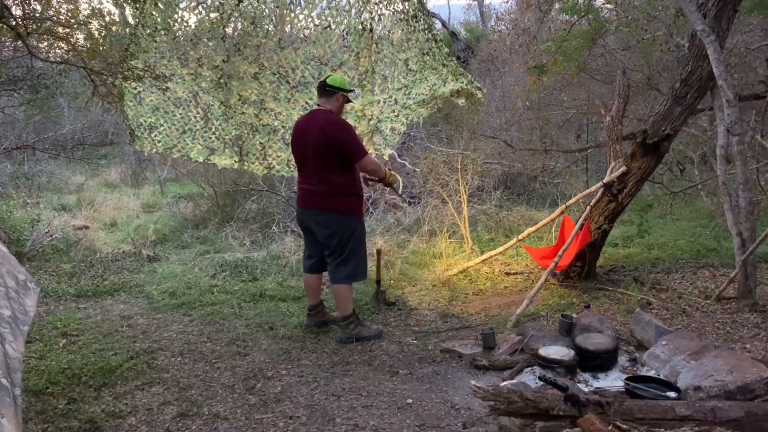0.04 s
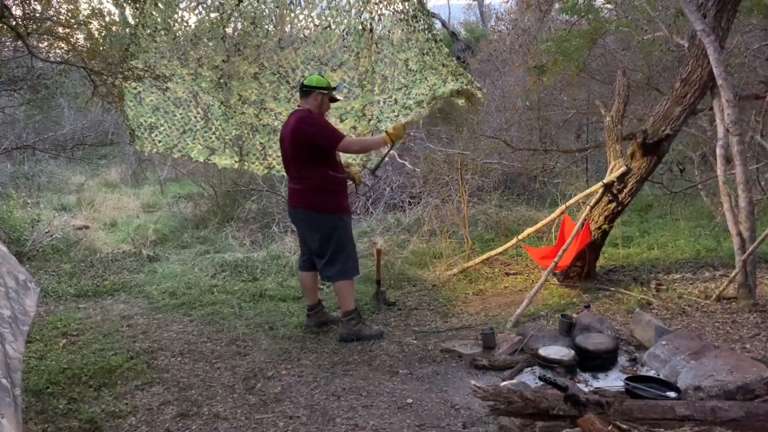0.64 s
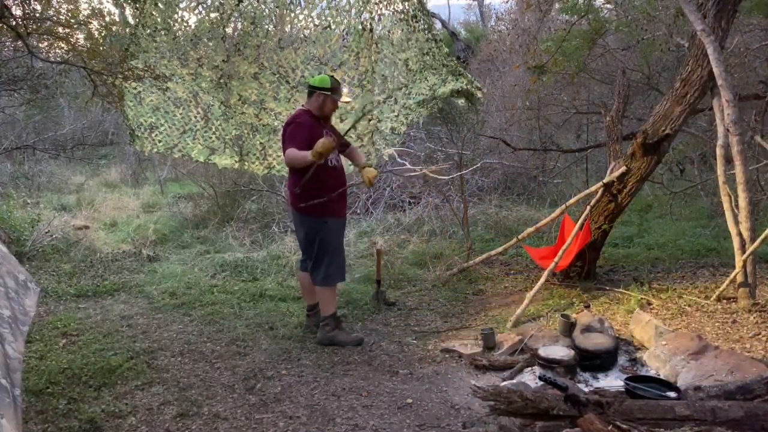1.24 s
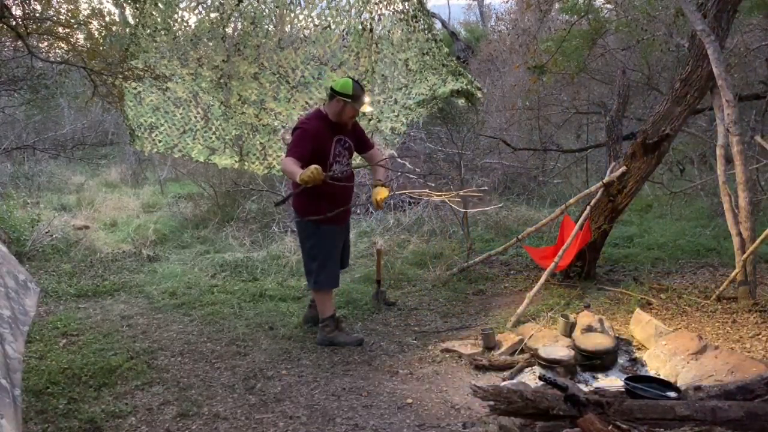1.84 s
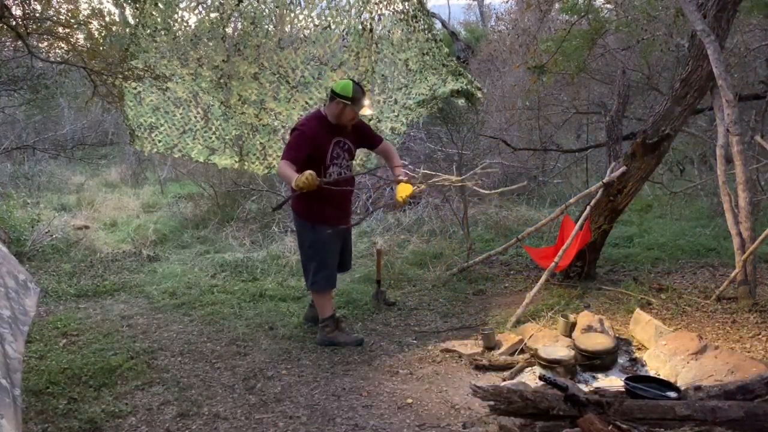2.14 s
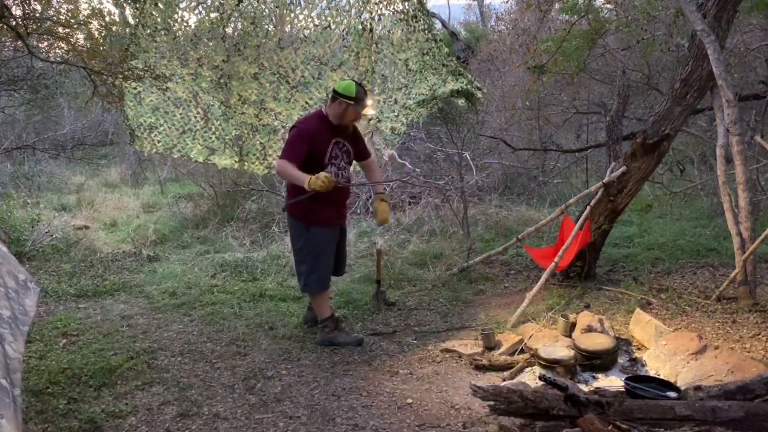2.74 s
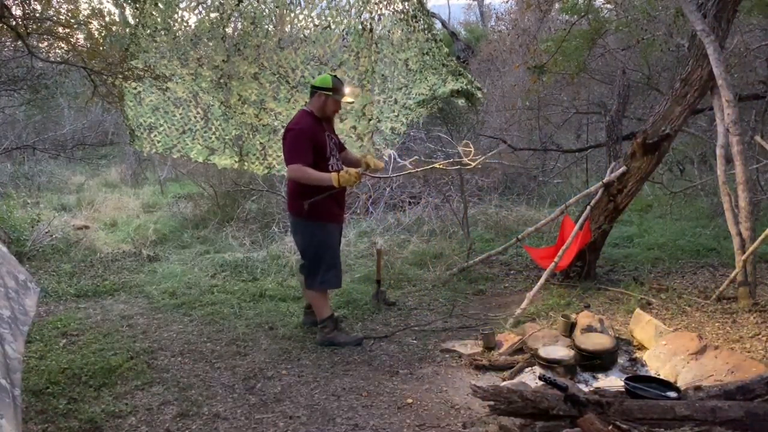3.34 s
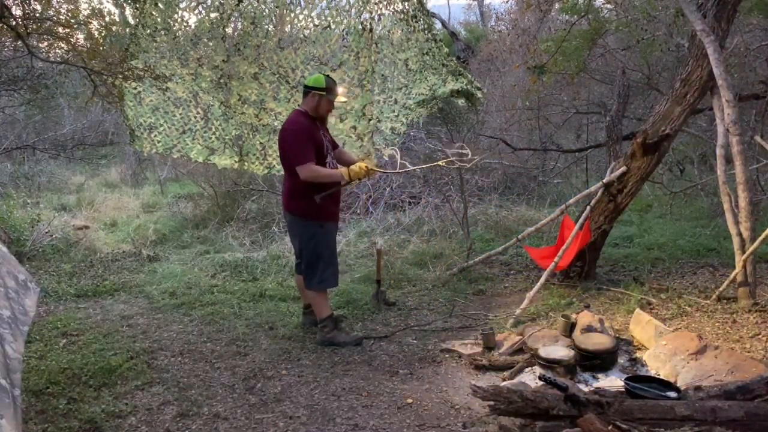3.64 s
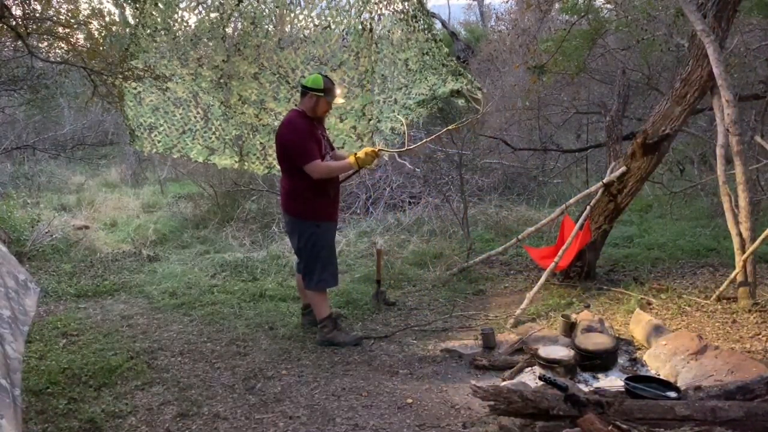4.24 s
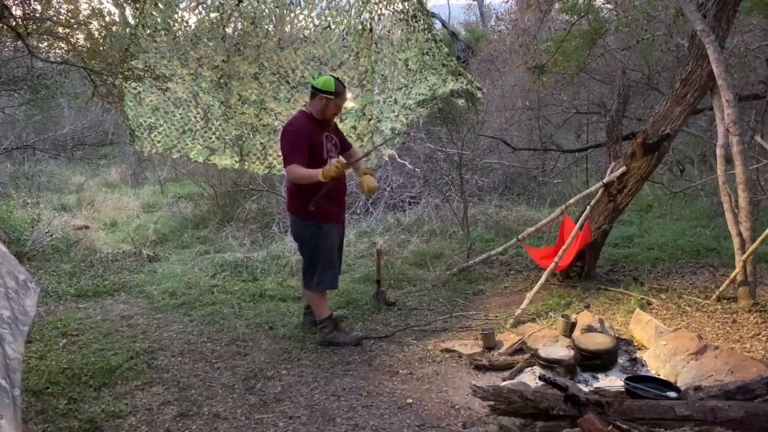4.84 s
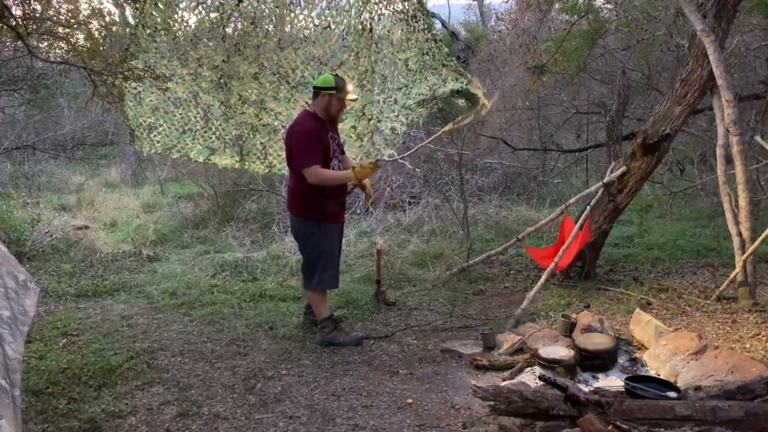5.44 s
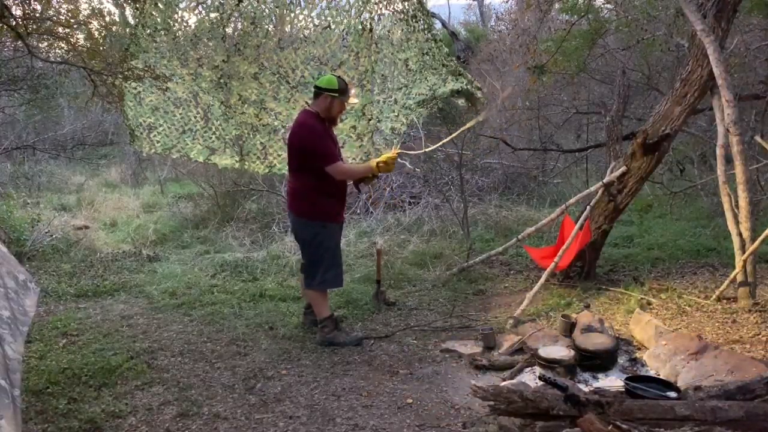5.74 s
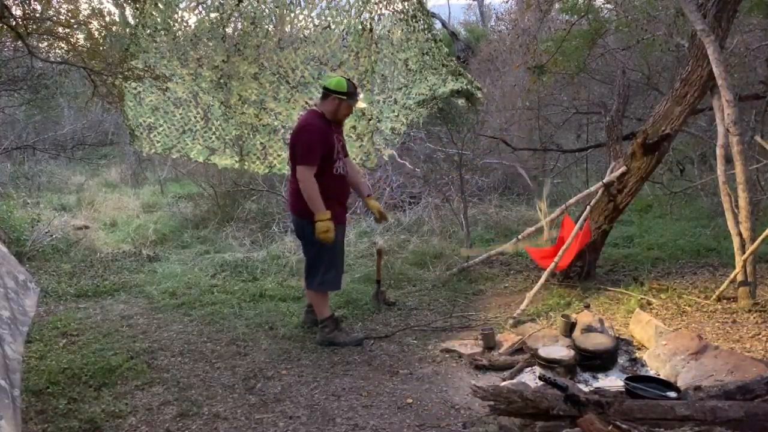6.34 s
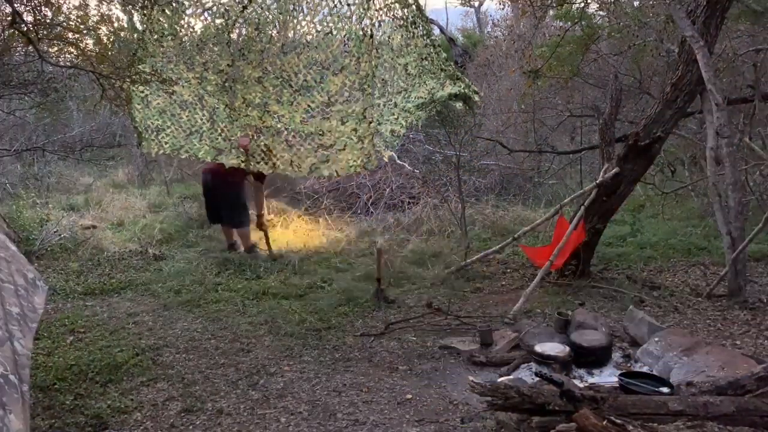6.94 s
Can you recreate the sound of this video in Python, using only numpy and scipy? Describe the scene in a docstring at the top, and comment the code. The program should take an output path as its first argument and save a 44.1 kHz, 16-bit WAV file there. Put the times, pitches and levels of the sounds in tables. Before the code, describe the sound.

Dry branches are snapped by hand and tossed onto a brush pile outdoors, over softly pulsing crickets and a low rumble of air.

```python
"""Dry branches are snapped by hand a few metres away and tossed into brush, in an evening wood.
From the start the air rumbles, crickets pulse and twigs tick; a far bird peeps, and a hum comes and goes.
Near 2.8 s wood cracks and a tossed stick crashes on a pile of thin branches, making them ring.
Near 3.8 s comes the loudest snap, as fibres tear and jolt the stick.
A second stick lands softly at 5.3 s and a third at 6.5 s, just before everything fades."""
import sys
import numpy as np
from scipy import signal
from scipy.fft import rfft, irfft, next_fast_len
from scipy.io import wavfile
from scipy.ndimage import uniform_filter1d

SR = 44100
rng = np.random.default_rng(int(sys.argv[2]) if len(sys.argv) > 2 else 0)


def put_to_file(sound):
    """Save the sound as 16-bit audio at rate SR, in the file named by the first command-line argument."""
    columns = np.atleast_2d(sound).T  # one column per channel
    safe = np.clip(columns, -1, 1)
    whole_steps = np.round(safe * 32767)
    wavfile.write(sys.argv[1], SR, whole_steps.astype(np.int16))


N = 308259
T = np.arange(N) / SR

# tone of the outdoor air: frequency_hz, level_db
AIR_TONE = [(15, -11.5), (28, -5), (45, 0.5), (90, -2.5), (150, -13.5), (250, -29.5), (520, -30),
            (1000, -42), (1600, -49), (4000, -52.5), (6500, -56.5), (9500, -54), (11500, -57), (14500, -57)]
# how alike the air sounds left and right: frequency_hz, likeness (0 to 1)
AIR_LIKENESS = [(60, 0.97), (290, 0.87), (640, 0.84), (1400, 0.12), (3000, 0.51), (6000, 0.1),
                (9000, 0.611), (15000, 1)]
# swells of the far hum: peak_s
HUM_PEAKS = [.98, 2.68, 3.402, 4.45]
# how the crickets drift off their beat: time_s, late_s
CHIRP_DRIFT = [(.9, -0.011), (2.55, .125), (3.35, -.11), (3.95, -.04), (6.5, .01)]
# bird peeps: start_s, pitch_hz
BIRD_PEEPS = [(.235, 5500), (.685, 3743), (0.976, 5540), (1.22, 5530), (2.05, 3710), (2.364, 5520),
              (2.59, 5530)]
# twigs flicking free: start_s, level_db
TWIG_TICKS = [(.115, -64.5), (.378, -62.5), (0.587, -58.5), (0.834, -71), (2.603, -65.5), (3.013, -48.5),
              (3.043, -50.5), (3.08, -44.5), (3.254, -65), (3.751, -57), (4.238, -62.5), (4.615, -62),
              (5.397, -50), (5.434, -47)]
# branches dragging over each other: start_s, level_db, length_s
BRANCH_DRAGS = [(0, -60.5, .045), (.448, -65.5, .018), (0.594, -62.5, 0.0089), (1.375, -82, 0.14),
                (2.721, -68.5, 0.018), (3.305, -71, .04), (3.773, -47, 0.024), (3.955, -54.5, 0.025),
                (4.137, -62, 0.017), (4.387, -57, .015), (4.554, -64, .02)]
# soft knocks of wood in the hands: start_s, level_db
HAND_KNOCKS = [(0.801, -73), (1.178, -67), (4.385, -61), (4.605, -64.5), (5.92, -72)]
# low bumps of a stick: start_s, level_db, pitch_hz, fade_s (a fade is the time to drop 60 dB)
STICK_THUMPS = [(2.801, -36.5, 348, 0.06), (2.806, -33.5, 140, 0.05), (3.846, -25, 450, 0.036),
                (6.56, -47, 340, .08), (6.579, -39, 90, 0.01)]
# sticks landing: start_s, crush_db, rattle_db, sink_s, bounce_gap_s, change_per_bounce_db
STICK_TOSSES = [(2.823, -31.5, -34, 0.016, .113, -11), (5.349, -52.5, -53, 0.075, 0.075, -37),
                (6.543, -41, -45, .038, 0.12, -13.5)]
# wood cracking as it breaks or strikes: start_s, level_db, ring_offset_db
WOOD_SNAPS = [(.03, -48.5, -3), (2.799, -46.5, 2), (3.7693, -44.5, -20), (3.7846, -27, -10),
              (3.845, -19.5, 2), (3.872, -34.5, -9), (4.381, -47.5, -9.5), (5.3501, -50, 3.5),
              (6.545, -44.5, 4)]
# ringing notes of the pile and of the held stick: pitch_hz, level_db, fade_s
PILE_NOTES = [(657.3, -0.5, 0.25), (1008, -2, .13), (1167, -12.5, .25), (1265.5, 1, .17), (1529, -12, .3),
              (1613, -2.5, 0.24), (1701, -7.5, .25), (2021, 6.5, 0.16), (2133, 0, .15), (3470, -10.5, 0.15),
              (4350, -6.5, .12)]
STICK_NOTES = [(1964, -0.5, 0.034), (2290, -0.5, 0.019), (2520, 1.5, 0.019), (2930, 3, 0.025),
               (6330, -10.5, 0.027), (8325, -7.5, 0.038), (9940, -0.5, .014)]
# tone of twig clicks, dull knocks, crushed brush and tearing fibres: frequency_hz, level_db
TWIG_TONE = [(500, -31.5), (2500, -12.5), (4200, -5), (5500, -9.5), (7000, -4), (9300, -3), (11500, -9),
             (13500, -9), (15500, -15)]
KNOCK_TONE = [(120, -18), (300, -7), (480, -8.5), (700, -4), (1300, -3.5), (2100, 0), (2800, -8),
              (4500, -20), (9000, -40.5)]
BRUSH_TONE = [(600, -17), (2000, -3.5), (3200, -0.5), (4200, -1.5), (5500, -8), (7000, 2.5), (9300, 0),
              (11500, -4.5), (13500, -2.5), (15500, -10.5)]
TEAR_TONE = [(200, -24), (450, -13.5), (900, -8.5), (1500, -7.5), (2900, -0.5), (3600, -6), (5500, -4),
             (7000, -5.5), (9700, 0), (13700, -2.5), (15500, -8)]
# echo among the trees: frequency_hz, fade_s
ECHO_FADES = [(400, 0.07), (1000, .2), (3000, 0.21), (8000, 0.23), (15000, 0.17)]
# how far the left microphone runs ahead of the right: frequency_hz, lead_radians
LEFT_LEAD = [(60, 0), (5500, 0), (7200, -2), (9300, -6), (11400, -9.5), (13500, -12), (14200, -12),
             (15600, -15.7)]


def amp(db):
    """Turns decibels into a gain."""
    return 10 ** (np.asarray(db) / 20)


def unit(x):
    """Scales a signal to an average power of 1."""
    return x / np.sqrt(np.mean(x ** 2) + 1e-20)


def steady(x, window):
    """Evens out the power over a sliding window of samples."""
    return x / np.sqrt(abs(uniform_filter1d(x ** 2, window)) + 1e-6)


def look_up(table, hz):
    """Reads between a table's rows, on a scale of octaves."""
    row_hz, value = np.transpose(table)
    return np.interp(np.log(hz + 1), np.log(row_hz + 1), value)


def add(mix, start_s, sound):
    """Mixes a sound in at its start time."""
    part = mix[max(round(start_s * SR), 0):][:len(sound)]
    part += sound[:len(part)]


def convolve(x, response):
    """Gives every sample of x the response as a tail, scaled to energy 1."""
    return signal.fftconvolve(x, response / np.linalg.norm(response))[:N]


def colour(x, tone, size=2048):
    """Filters x to a tone table, with no sound ahead of a click."""
    log_gain = np.log(amp(look_up(tone, abs(np.fft.fftfreq(size, 1 / SR)))))
    spectrum = np.exp(np.conj(signal.hilbert(log_gain)))
    return convolve(x, np.fft.ifft(spectrum).real)


def ring(x, notes, low_hz=290):
    """Struck wood rings with dying notes; thin wood gives off no bass."""
    t = T[:SR]
    response = sum(amp(db - 60 * t / fade_s) * np.cos(2 * np.pi * hz * t) * (-1) ** k
                   for k, (hz, db, fade_s) in enumerate(notes))
    bass_cut = signal.butter(2, low_hz, "high", fs=SR, output="sos")
    return convolve(x, signal.sosfilt(bass_cut, response))


def band(hz, width_hz):
    """Complex noise around one pitch; around 0 Hz it is a random wobble."""
    freqs = np.fft.fftfreq(next_fast_len(N), 1 / SR)
    bell = np.exp(-.5 * ((freqs - hz) / width_hz) ** 2)
    noise = np.fft.ifft(np.fft.fft(rng.standard_normal(len(freqs))) * bell)[:N]
    return noise / np.std(noise)


def chance(per_s):
    """Marks random moments, about per_s each second."""
    return rng.random(N) < per_s / SR


def crackle(per_s, spread_db, window):
    """Tiny fractures click with uneven strength but steady overall power."""
    strength = rng.standard_normal(N) * amp(spread_db * np.minimum(rng.exponential(1, N), 4))
    return steady(strength * chance(per_s), window)


def burst(length_s):
    """A loudness shape that holds for about its length, then dies quickly."""
    return np.exp(-(T[:SR // 2] / length_s) ** 4 / 2)


def microphones(pair, aside, centre_hz=3000, width=.75):
    """Sound bends round to two microphones and arrives out of step, more so from the side."""
    size = next_fast_len(N + 2048)
    hz = np.fft.rfftfreq(size, 1 / SR)
    bell = np.exp(-.5 * (np.log((hz + 1) / centre_hz) / width) ** 2)
    lead = look_up(LEFT_LEAD, hz) - aside * bell
    return irfft(rfft(pair, size) * np.exp(.5j * np.array([lead, -lead])), size)[:, :N]


def outdoors(x, echo_db, apart=.85):
    """Adds echoes from trunks and ground, partly different left and right."""
    scatter = rng.standard_normal((3, SR // 2)) * (rng.random((3, SR // 2)) < .15)
    scatter *= np.minimum(T[:SR // 2] / .0027, 1)
    hz, t, spectrum = signal.stft(scatter, SR, nperseg=256)
    fade = amp(-60 * t / look_up(ECHO_FADES, hz)[:, None])
    left, right, shared = signal.istft(spectrum * fade, SR, nperseg=256)[1]
    return np.array([x + amp(echo_db) * convolve(x, shared + apart * side) for side in (left, right)])


def air(level_db=-51.4, swell_db=1.2, lean_db=.44):
    """The air rumbles low with a faint hiss, slowly swelling."""
    size = next_fast_len(N)
    hz = np.fft.rfftfreq(size, 1 / SR)
    left, other = rfft(rng.standard_normal((2, size)))
    same = np.clip(look_up(AIR_LIKENESS, hz), 0, 1)
    right = same * left + np.sqrt(1 - same ** 2) * other
    pair = irfft(np.array([left, right]) * amp(look_up(AIR_TONE, hz)), size)[:, :N]
    return amp(level_db + swell_db * band(0, 2.1).real) * unit(pair) * amp([[-lean_db], [lean_db]])


def hum(level_db=-73, pitch_hz=510, width_hz=70, length_s=.26):
    """A soft, hollow hum swells and fades far away."""
    swell = sum(np.exp(-(2 * (T - peak_s) / length_s) ** 2) for peak_s in HUM_PEAKS)
    return amp(level_db) * swell * unit(band(pitch_hz, width_hz).real)


def trill(pitch_hz, width_hz, strokes_hz, depth=.3, overtone_db=-27):
    """Wing strokes pulse a tone that many insects and the trees smear into a narrow band."""
    pace_hz = strokes_hz * (1 + .03 * band(0, 1.8).real)
    pulse = unit(1 + depth * np.sin(2 * np.pi * np.cumsum(pace_hz) / SR))
    shared = band(pitch_hz, width_hz)
    tone = np.array([shared + .5 * band(pitch_hz, width_hz) for _ in range(2)])
    tone /= (1 + abs(tone) ** 2) ** .36  # a few near singers keep the tone steady
    overtone = amp(overtone_db) * tone ** 2 / abs(tone)
    return pulse * unit((tone + overtone).real)


def crickets(chirp_db=-63, lull_db=-71.5, first_s=.42, beat_s=.51, chirp_s=.22, edge_s=.07):
    """A chorus chirps together on a drifting beat, with steady higher trills behind it."""
    beats = (T - first_s - np.interp(T, *np.transpose(CHIRP_DRIFT))) / beat_s
    off_beat_s = abs(beats - np.round(beats)) * beat_s
    swell = amp(lull_db) + amp(chirp_db) * np.clip((chirp_s / 2 - off_beat_s) / edge_s + .5, 0, 1)
    chorus = trill(2308, 82, 42) + amp(-10) * trill(2320, 150, 97)
    higher = amp(-73.5) * trill(2883, 70, 52) + amp(-76) * trill(2660, 220, 36)
    return swell * chorus + higher


def bird(level_db=-78.5, length_s=.047, glide=.035, rough=.012):
    """A small, far bird gives thin, slightly buzzy peeps that fall in pitch."""
    peeps, t = np.zeros(N), np.arange(0, length_s, 1 / SR)
    quaver = rough * band(0, 150).real
    swell = amp(level_db) * np.sin(np.pi * t / length_s)
    for start_s, hz in BIRD_PEEPS:
        pitch_hz = hz * (1 + glide * (.5 - t / length_s) + quaver[round(start_s * SR):][:len(t)])
        add(peeps, start_s, swell * np.sin(2 * np.pi * np.cumsum(pitch_hz) / SR))
    return outdoors(peeps, echo_db=-1.5)


def twigs(tick_s=.005, knock_s=.0093, stray_db=-80, snag_db=3.5, snag_hz=70, knock_db=-11):
    """Twigs catch in sprays of bright clicks over duller knocks; dragged branches snag and slip."""
    flicks, drags, knocks = np.zeros((3, N))
    for start_s, db in TWIG_TICKS:
        add(flicks, start_s, amp(db) * burst(tick_s))
    for start_s, db, length_s in BRANCH_DRAGS:
        add(drags, start_s, amp(db) * burst(length_s))
    for start_s, db in HAND_KNOCKS:
        add(knocks, start_s, amp(db) * burst(knock_s))
    strays = amp(stray_db + 3 * rng.standard_normal(N)) * chance(per_s=5)
    snags = unit(amp(snag_db * unit(band(0, snag_hz).real)))
    spray = flicks + drags * snags + signal.oaconvolve(strays, burst(tick_s))[:N]
    clicks = spray * crackle(3500, 4, window=220)
    thuds = (knocks + amp(knock_db) * spray) * crackle(2000, 3, window=180)
    return outdoors(colour(clicks, TWIG_TONE) + colour(thuds, KNOCK_TONE), echo_db=-3.5)


def thumps(rise_s=.004):
    """A stick flexes as it breaks or lands, giving a short, low bump."""
    bumps, t = np.zeros(N), T[:SR // 2]
    for start_s, db, hz, fade_s in STICK_THUMPS:
        loudness = amp(db - 60 * t / fade_s) * np.minimum(t / rise_s, 1)
        add(bumps, start_s, loudness * np.sin(2 * np.pi * hz * t))
    return bumps


def clacks(low_hz=900, high_hz=2400, per_s=22, fade_s=.045, count=28):
    """Many dry twigs knock together, each with its own pitch and short ring."""
    clatter, t = np.zeros(N), T[:SR // 8]
    for hz in np.linspace(low_hz, high_hz, count):
        knocks = rng.standard_normal(N) * chance(per_s)
        note = amp(-60 * t / fade_s) * np.cos(2 * np.pi * hz * t)
        clatter += signal.oaconvolve(knocks, note)[:N]
    return steady(clatter, window=1300)


def landings(touch_db=-7, crush_fade_s=.2, rattle_rise_s=.01, rattle_fade_s=.31, hits=5):
    """A falling stick crushes dry brush and rattles the pile, more weakly at each bounce."""
    crush_power, rattle_power, t = np.zeros(N), np.zeros(N), T[:SR]
    for start_s, crush_db, rattle_db, sink_s, gap_s, bounce_db in STICK_TOSSES:
        # the crush grows until the stick has sunk in, then dies
        growing_db = touch_db * np.maximum(1 - t / sink_s, 0)
        crush = amp(crush_db + growing_db - 60 * np.maximum(t - sink_s, 0) / crush_fade_s)
        rattle = amp(rattle_db - 60 * np.maximum(t - sink_s / 2, 0) / rattle_fade_s)
        rattle *= np.minimum(t / rattle_rise_s, 1)
        for k in range(hits):
            hit_s = start_s + k * gap_s
            add(crush_power, hit_s, (amp(k * bounce_db) * crush) ** 2)
            add(rattle_power, hit_s, (amp(k * bounce_db * .79) * rattle) ** 2)  # loses less per bounce
    blows = np.sqrt(rattle_power) * crackle(800, 4, window=500)
    splinters = np.sqrt(crush_power) * crackle(6500, 3.6, window=550)
    splinters *= unit(amp(1.8 * band(0, 90).real))  # twigs give way in clumps
    pile = amp(-1.8) * ring(blows, PILE_NOTES) + amp(-8) * colour(blows, KNOCK_TONE)
    pile += amp(-6) * np.sqrt(rattle_power) * clacks()
    return outdoors(pile + colour(splinters, BRUSH_TONE), echo_db=-4)


def snaps(tear_s=.0034):
    """A run of fibres tears within milliseconds and jolts the stick into ringing."""
    fibres = crackle(9000, 2.7, window=130)
    tear, jolt = np.zeros((2, N))
    for start_s, db, ring_offset_db in WOOD_SNAPS:
        add(tear, start_s, amp(db) * burst(tear_s))
        add(jolt, start_s, amp(db + ring_offset_db) * burst(tear_s))
    crack = outdoors(colour(tear * fibres, TEAR_TONE), echo_db=-6.5)
    return crack + outdoors(ring(jolt * fibres, STICK_NOTES), echo_db=-15.5)


def scene():
    """Wood breaks almost straight ahead; the pile and the background lie to the right."""
    ahead = microphones(snaps() + twigs() + thumps(), aside=.41)
    to_the_right = microphones(landings() + bird() + hum() + air(), aside=1.66)
    return ahead + to_the_right + microphones(crickets(), aside=2.09)


def record(dry, end_s=6.71, fade_s=.049, top_hz=15900):
    """Fades to silence just before the end and cuts the highest treble."""
    faded = dry * np.clip((end_s - T) / fade_s + .5, 0, 1)
    treble_cut = signal.firwin(401, top_hz, window=("kaiser", 9), fs=SR)
    return signal.oaconvolve(faded, treble_cut[None], "same")


dry = scene()
out = record(dry)
put_to_file(out)
```